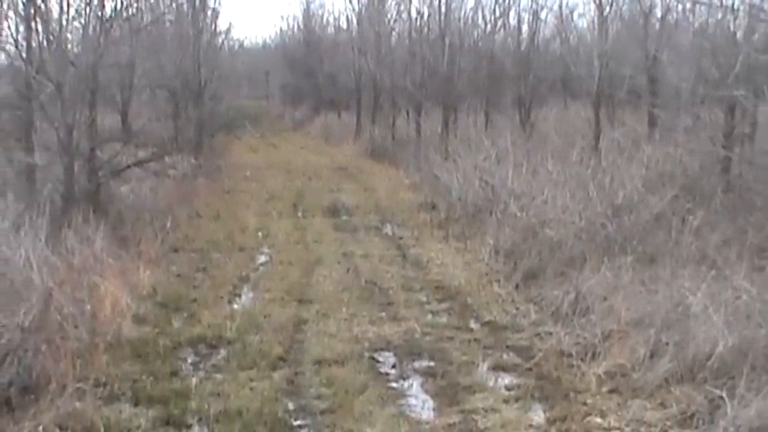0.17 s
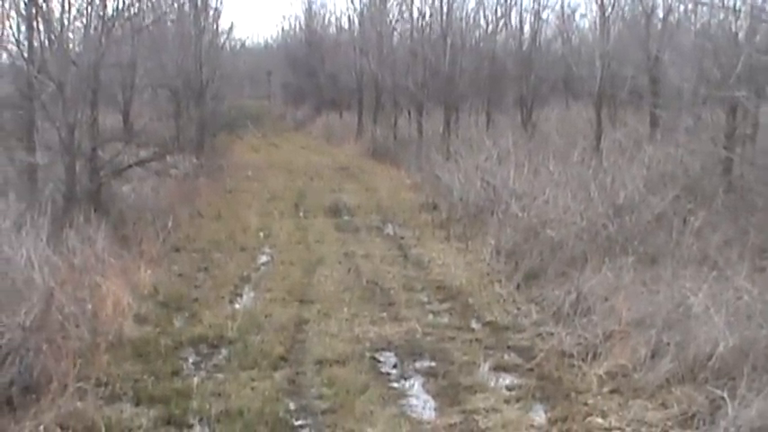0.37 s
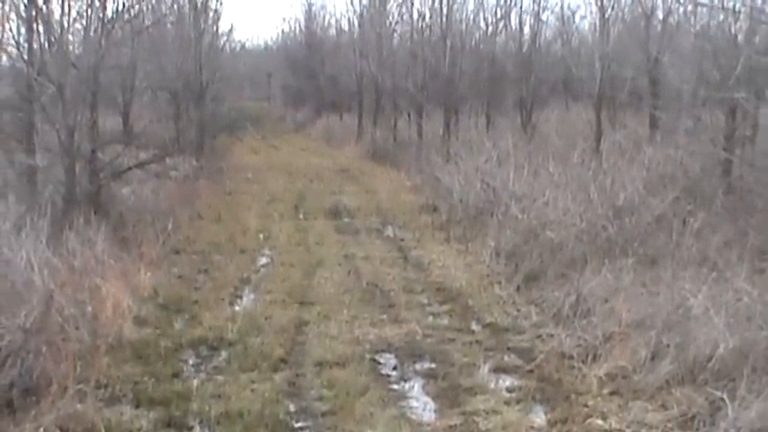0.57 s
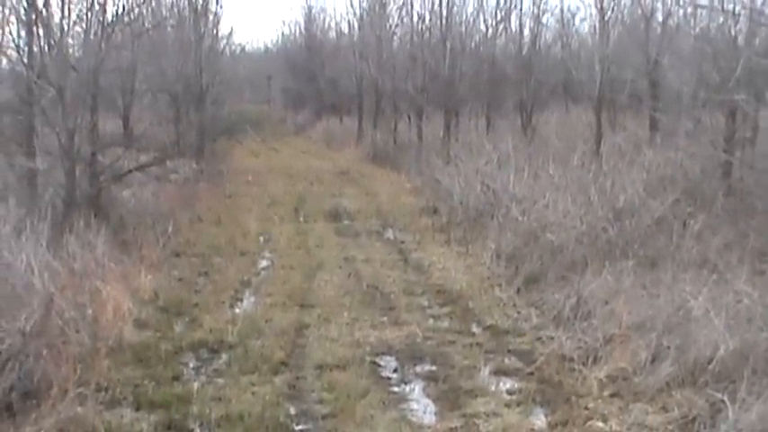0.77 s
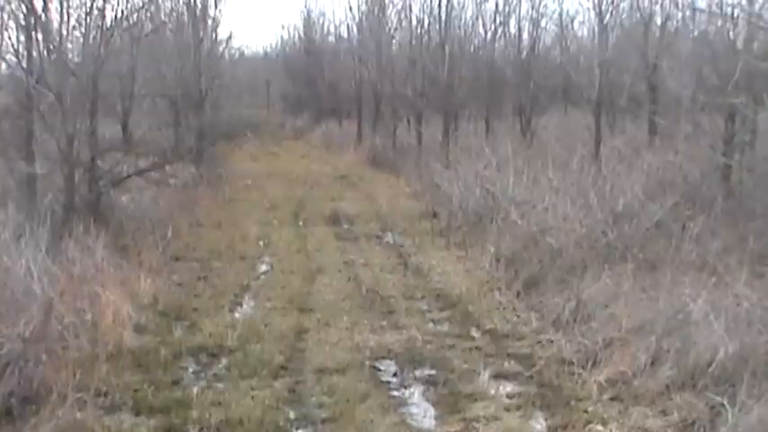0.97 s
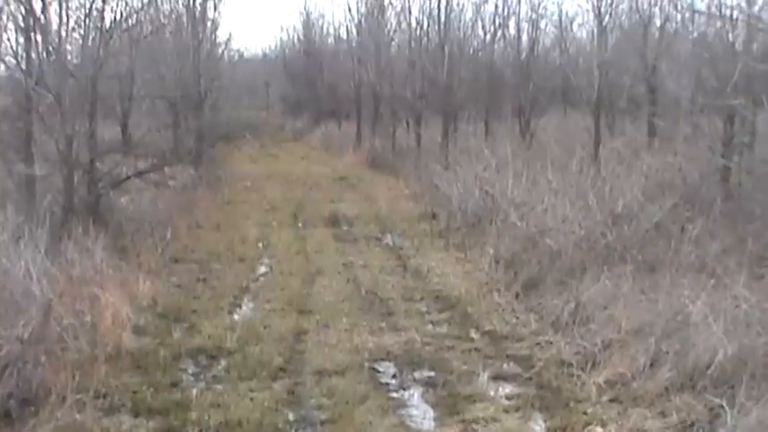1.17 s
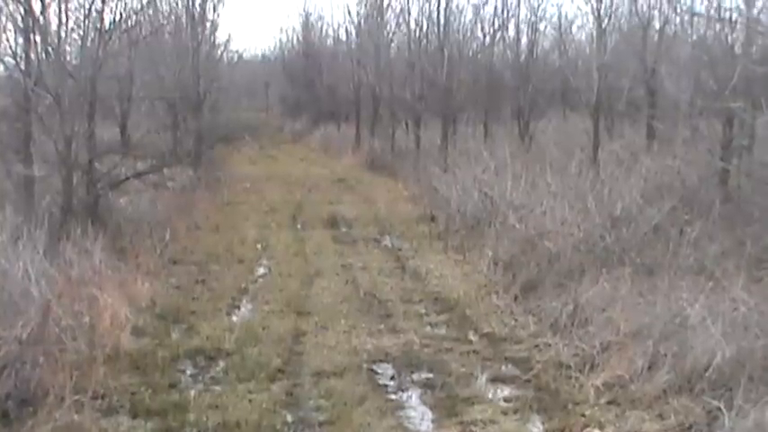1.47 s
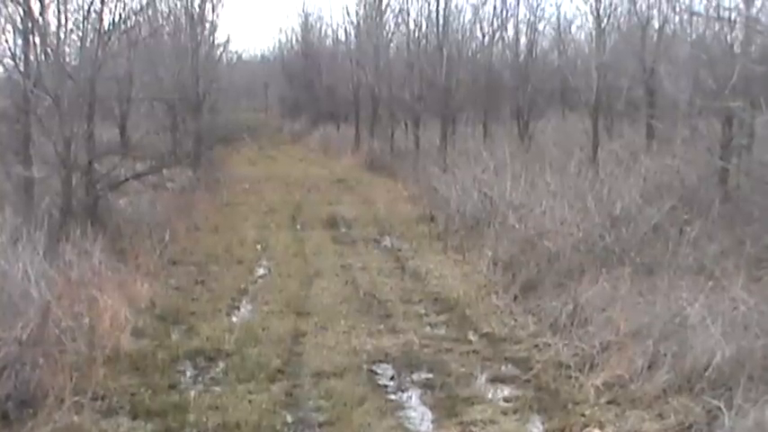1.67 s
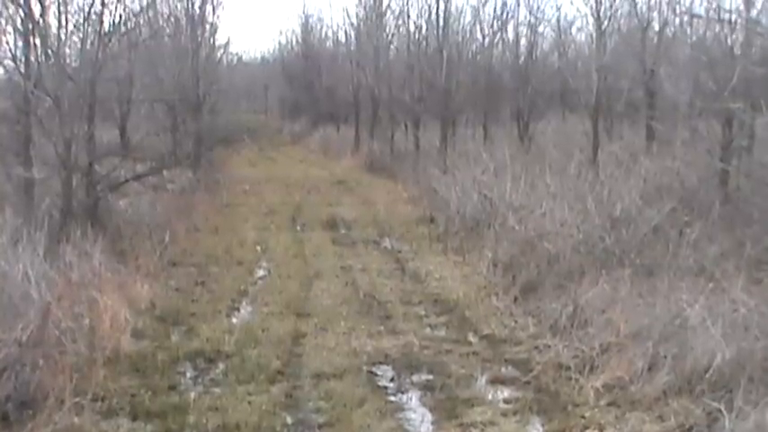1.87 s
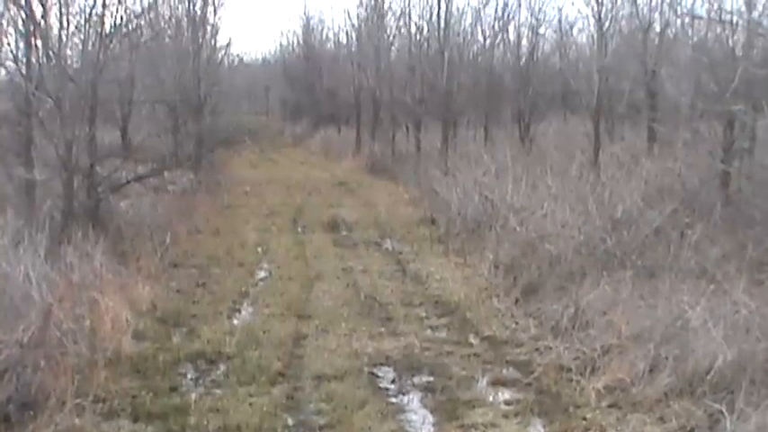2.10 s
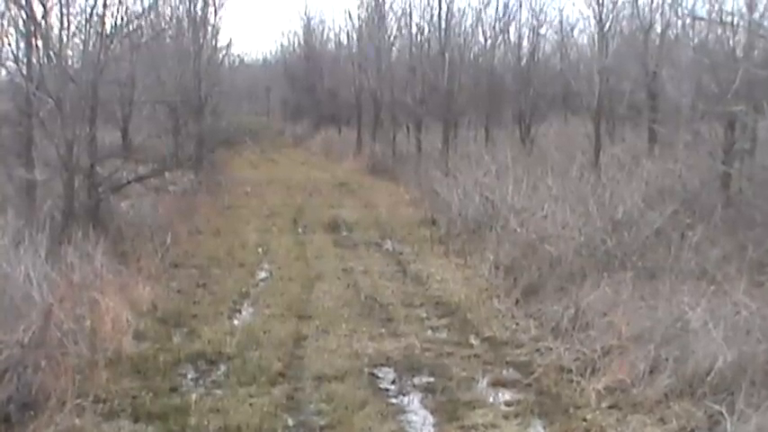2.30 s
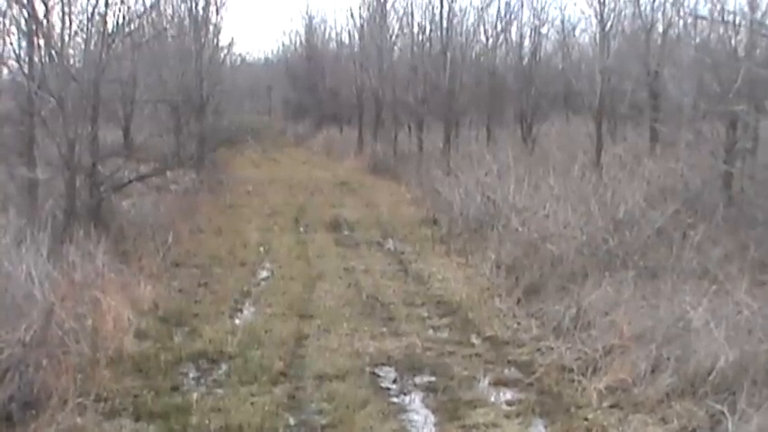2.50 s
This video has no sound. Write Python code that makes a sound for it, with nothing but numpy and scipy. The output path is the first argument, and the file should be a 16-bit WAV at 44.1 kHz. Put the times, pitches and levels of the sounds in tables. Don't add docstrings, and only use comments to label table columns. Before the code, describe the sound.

A hound bays in calm bare woods, out of sight and slightly left. An earlier bay's echo fades, then five short bays come at about 0.25, 0.75, 1.25, 1.8 and 2.25 seconds: high yelp, rasp, lower steady voice, quick closing blip, long thin echo. A twig snaps clearly at 0.45, faintly at 2.2. Soft hiss continues; low wind thumps touch the microphone from 1.3, strongest near 2.05.

```python
import sys
import numpy as np
from scipy import signal
from scipy.fft import rfft, irfft, next_fast_len
from scipy.io import wavfile
from scipy.ndimage import uniform_filter1d, map_coordinates

SR = 44100
rng = np.random.default_rng(int(sys.argv[2]) if len(sys.argv) > 2 else 0)


def output_pcm(signal):
    pcm = np.clip(np.atleast_2d(signal).T, -1, 1) * 32767
    wavfile.write(sys.argv[1], SR, np.round(pcm).astype(np.int16))


def ratio(d):
    e = np.asarray(d, float) / 20
    return 10 ** e


N = 116865
LEAD_S = 0.25

# [f/Hz, level/dB]
AIR_TONE = [(12, -48), (20, 6), (315, -1), (746, -5), (1070, -10), (1500, -16.5), (1670, -13.5),
            (2330, -16), (15500, -21.5)]
# [f/Hz, likeness 0-1]
AIR_ALIKE = [(60, 1), (200, 0.49), (500, 0.51), (1500, 0.35), (5000, 0.067), (14000, 0.87)]
# [f/Hz, level/dB]
WHINE = [(15734, -68)]
AIR_DB = -48.5

# [f/Hz, time to fall 60 dB/s]
TRUNK_RING = [(450, 0.6), (800, 0.33), (1150, 0.9), (1750, .9), (3000, 0.85), (6000, 0.24)]
# [delay/s, level/dB]
NEAR_TRUNKS = [(.011, -17), (.023, -50), (.041, -17.5)]
TRUNKS_DB, TRUNKS_ALIKE = -16, 0.86
DOG_LEFT_DB = 2.5

# [t/s, pitch/Hz, level/dB]
YELP = [
    [(0.236, 792, -26), (0.252, 801, -17), (0.322, 698.4, -36.5), (0.34, 633, -56)],
    [(1.254, 716, -29.5), (1.272, 802.5, -20.5), (1.308, 707.3, -21), (1.4, 722, -38.5)],
    [(1.775, 932, -45), (1.789, 941, -40), (1.803, 755, -38), (1.85, 648.4, -38)],
    [(2.238, 842, -28.5), (2.252, 851.4, -21), (2.314, 702, -35), (2.335, 708, -21)],
]
# [t/s, pitch/Hz, level/dB]
GLIDE = [
    [(.731, 782, -40), (.739, 858, -34), (.759, 1038, -36), (.769, 1240, -33), (.775, 1305, -30),
     (.781, 1270, -34)],
    [(.787, 665, -33), (.802, 650, -27), (.815, 640, -36)],
]
YELP_OVERTONES_DB = [2, -19.5, -20, -17, -29.5, -64]
YELP_DB, YELP_TOP_HZ = 0, 4100
EDGE_S, RELEASE_S = 0.0042, 0.015
SHAKE_FULL_DB, SHAKE_DEPTH, SHAKE_RATE = -33, 0.38, 190

# [t/s, level/dB, mouth resonance/Hz]
RASP = [
    [(-.24, -26.5, 2900), (-.14, -28.5, 2840)],
    [(.245, -34, 3100), (.265, -29.5, 2230), (.283, -22, 2080), (.3, -25, 1620), (.329, -36, 2220),
     (.367, -39, 2360), (.385, -29, 1580)],
    [(.733, -41, 2370), (.745, -25, 3011), (.76, -27.5, 2880), (.775, -28.5, 2542), (.8, -25, 3200),
     (.82, -47, 2315), (.85, -35, 2400), (.866, -27, 1720), (.875, -36, 1500)],
    [(1.27, -24.5, 1610), (1.285, -33, 1760), (1.31, -29.5, 1907), (1.335, -28, 1750), (1.35, -35, 1300),
     (1.39, -33, 2580), (1.405, -40, 1400)],
    [(1.777, -38.5, 2960), (1.797, -27.5, 2312), (1.815, -29, 2665), (1.835, -35.5, 2865),
     (1.87, -36, 2500), (1.917, -37, 2600), (1.93, -43, 1590)],
    [(2.257, -33, 1690), (2.272, -31, 2407), (2.288, -29.5, 2094), (2.303, -37, 1680), (2.318, -34.5, 1230),
     (2.35, -50, 2222), (2.375, -29.5, 1700)],
]
# [f/Hz, width/Hz, level/dB]
CAVITIES = [(668, 92, 14), (1400, 480, 2), (1890, 330, -1), (2365, 340, -2), (2684, 100, 2.5),
            (3033, 84, 9), (4030, 230, 7), (8450, 3000, -34)]
MOUTH_HZ = [1200, 1500, 1900, 2350, 2800, 3200]
MOUTH_SHARP, MOUTH_DB = 7, 17
RASP_DB, RASP_SIZE_DB = 2, 2.5
RASP_RATE, RASP_SCATTER = 360, 0.06
RASP_OF_YELP, RASP_DRIFT = 0.4, 0.045

# [t/s, pitch/Hz, level/dB, mouth opening 0-1, upper ring/dB]
BAY = [
    [(.296, 560, -32, .85, -5), (.306, 559.3, -23, 0.7, -14.5), (.321, 562.7, -22.5, 0.8, -15),
     (.339, 541, -33.5, 0.25, 0), (.352, 537.4, -33, 0.7, 3.5), (.365, 538, -25.5, 0.84, 2),
     (.38, 569, -29, 1, -12)],
    [(.779, 618, -25, 0.43, -23), (.788, 610.3, -22.5, 0.72, -4), (.804, 595, -21.5, 0.75, 6),
     (.814, 577.6, -23, 0.5, -11), (.826, 576, -23.5, 0, -36), (.848, 573.6, -27, 0.26, -10),
     (.861, 585, -28, .7, -1), (.87, 550, -20, 0.5, 3)],
    [(1.343, 561, -26, 0.3, -2), (1.35, 560.7, -29, 0.68, 5), (1.36, 555.6, -28, 0.98, -15),
     (1.374, 559, -30, 1, -7), (1.394, 558.5, -34, 0.84, 8), (1.403, 556.4, -39, 0.8, -4)],
    [(1.803, 622.8, -38, 0.43, -3), (1.821, 597.6, -30.5, .1, -2), (1.837, 575.5, -32, 0.41, 11.5),
     (1.857, 567.7, -25.5, 0.01, -16), (1.889, 574.5, -30.5, 0.04, -1.5), (1.91, 580.3, -28.5, 0.15, 3),
     (1.925, 585.6, -30, 0.03, -5), (1.933, 563.4, -32, 0.5, -16)],
    [(2.308, 633, -20, 0.35, 2), (2.318, 612, -37, 0.05, -1), (2.329, 593.5, -29.5, 0.21, -4),
     (2.338, 580, -28.5, 0.24, 8), (2.35, 591.8, -34.5, 0.56, 12.5), (2.365, 567, -33, 0.49, 10),
     (2.371, 557, -43, 0.6, -5)],
]
EARLIER_BAY = [
    (-.23, 539.4, -21, .3, 1.8),
    (-.12, 524.4, -31.5, 0.25, 1.8),
]
# [f/Hz, level/dB]
THROAT = [(1150, 2), (1750, 1), (2300, -18.5), (3000, -6.5), (3500, -22.5), (4500, -28), (5300, -42.5),
          (8500, -37)]
BAY_DB, CHEST_DB = 0.5, -8
CHEST_FOLLOWS = 0.21

# [t/s, level/dB, length/s]
CLOSES = [
    (0.368, -29, 0.023),
    (0.859, -26.5, 0.026),
    (1.398, -22.5, 0.023),
    (1.907, -43, 0.0313),
    (2.361, -30, 0.024),
]
CLOSE_FROM_HZ, CLOSE_TO_HZ, CLOSE_FALL, CLOSE_SWELL_DB = 1150, 700, 3, 14

# [f/Hz, level/dB]
AIRFLOW_TONE = [(3500, -1), (6000, -6), (7200, -5), (9000, 1), (11000, -6), (13000, -27)]
AIRFLOW_DB, AIRFLOW_LAG_S, AIRFLOW_GROWS = -44.5, 0.075, 0.49
OPEN_MOUTH_HZ = 1000

# [t/s, treble/dB, breath hiss/dB]
FACING = [
    (-.1, 4, 12),
    (0.299, -1, 2.5),
    (.8, -0.5, 1),
    (1.35, -9.5, 0.5),
    (1.85, -3, 2),
    (2.351, -8, 5.5),
]
FACING_HZ, BEAM_TOP_HZ = 2170, 3960
SIDEWAYS_EVEN = 0.99

# [t/s, peak/dB]
SNAPS = [
    (.455, -19.5),
    (2.217, -38.5),
]
# [f/Hz, level/dB, time to fall 60 dB/s]
TWIG_TONES = [(3500, -8, 0.005), (7240, -10, 0.003), (9670, -8, 0.005), (12100, -4, 0.004)]
TWIG_TOP_HZ = 13500

# [t/s, level/dB, width/s]
LUMPS = [(1.33, -39, 0.0085), (1.815, -27.5, 0.0054), (1.83, -29.5, 0.0059), (1.845, -30, 0.0033),
         (1.9, -30, 0.0051), (1.92, -35.5, 0.0047), (2.012, -48, 0.0077), (2.022, -23.5, 0.0046),
         (2.048, -23, 0.0026), (2.062, -26, 0.0033), (2.073, -34, 0.0032), (2.17, -34, 0.0086),
         (2.22, -35, 0.0059), (2.33, -39, 0.0076), (2.37, -36, 0.0068), (2.6, -49, 0.0072)]
LUMP_NARROW = 0.71
FLUTTER_DB, FLUTTER_HZ, FLUTTER_SPREAD = -11.5, 194.5, 5.7

LOW_CUT_HZ, TOP_HZ = 40, 15880


def unit(x):
    return x / np.sqrt(np.mean(x ** 2) + 1e-20)


def along(points, hz):
    f, value = np.transpose(points)
    return np.interp(np.log(hz + 1), np.log(f + 1), value)


def clock():
    return np.arange(-round(LEAD_S * SR), N) / SR


def phrases(tables):
    t = clock()
    gate = 0
    for rows in tables:
        opening = (t - rows[0][0]) / EDGE_S
        closing = (rows[-1][0] - t) / RELEASE_S
        gate = gate + np.clip(np.minimum(opening, closing) + 0.5, 0, 1)
    times, *columns = np.transpose(np.concatenate(tables))
    return [gate ** 2] + [np.interp(t, times, column) for column in columns]


def wobble(rate):
    n = len(clock())
    knots = rng.standard_normal(int(n * rate / SR) + 4)
    return map_coordinates(knots, [np.arange(n) * rate / SR])


def filtered(x, response):
    n = x.shape[-1]
    m = next_fast_len(n + 8192)
    return irfft(rfft(x, m) * response(np.fft.rfftfreq(m, 1 / SR)), m)[..., :n]


def air():
    def middle_and_side(f):
        turn = np.arccos(np.clip(along(AIR_ALIKE, f), -1, 1)) / 2
        return ratio(along(AIR_TONE, f)) * [np.cos(turn), np.sin(turn)]

    mid, side = filtered(rng.standard_normal((2, N)), middle_and_side)
    level = ratio(AIR_DB + 0.057 * wobble(2.1)[:N])
    hush = np.array([mid + side, mid - side]) / np.std(mid) * level
    t = np.arange(N) / SR
    return hush + sum(np.sqrt(2) * ratio(db) * np.sin(2 * np.pi * hz * t) for hz, db in WHINE)


def woods(ahead, sideways):
    hz, t, z = signal.stft(rng.standard_normal((3, SR)), SR, nperseg=256)
    fade = ratio(-60 * t / along(TRUNK_RING, hz)[:, None])
    tail = signal.istft(z * fade, SR, nperseg=256)[1]
    own = np.sqrt(1 - min(TRUNKS_ALIKE, 0.99) ** 2)
    tail = TRUNKS_ALIKE * tail[2] + own * tail[:2]
    tail = tail / np.linalg.norm(tail[0])
    delayed = np.pad(sideways, (600, 0))[None]
    wet = signal.fftconvolve(delayed, tail, axes=1)[:, :len(ahead)]
    near = ahead + sum(ratio(db) * np.roll(ahead, round(s * SR)) for s, db in NEAR_TRUNKS)
    balance = ratio([[DOG_LEFT_DB / 2], [-DOG_LEFT_DB / 2]])
    return (near * balance + ratio(TRUNKS_DB) * wet)[:, -N:]


def yelp():
    gate, hz, db = phrases(sorted(YELP + GLIDE))
    rasp_gate, rasp_db, _ = phrases(RASP)
    shake = SHAKE_DEPTH * np.clip(rasp_gate * ratio(rasp_db - SHAKE_FULL_DB), 0, 1)
    phase = 2 * np.pi * np.cumsum(hz) / SR + shake * wobble(SHAKE_RATE)
    tone = 0
    for k, overtone_db in enumerate(YELP_OVERTONES_DB, 1):
        fade = 1 + (k * hz / YELP_TOP_HZ) ** 10
        tone = tone + ratio(overtone_db) * np.sin(k * phase) / fade
    level = ratio(db + YELP_DB) * (1 + shake * wobble(SHAKE_RATE))
    return np.sqrt(2) * gate * level * tone


def rasp():
    gate, db, mouth_hz = phrases(RASP)
    yelp_hz = phrases(sorted(YELP + GLIDE))[1]
    pulse_hz = RASP_OF_YELP * yelp_hz * (1 + RASP_DRIFT * wobble(45))
    beats = np.flatnonzero(np.diff(np.floor(np.cumsum(pulse_hz) / SR)))
    count = len(beats)
    scatter = RASP_SCATTER * rng.standard_normal(count) * SR / RASP_RATE
    at = np.clip(beats + scatter, 0, len(gate) - 1).astype(int)
    sizes = ratio(RASP_SIZE_DB * rng.standard_normal(count))
    pulses = np.bincount(at, sizes, len(gate))
    pulses = unit(pulses - pulses.mean()) + 0.2 * rng.standard_normal(len(gate))

    def ring(f, centre, width):
        return 1j * f * width / (centre * centre - f * f + 1j * f * width)

    def throat_response(f):
        rings = sum((-1) ** k * ratio(g) * ring(f, c, w) for k, (c, w, g) in enumerate(CAVITIES))
        low_cut = f ** 4 / (f ** 4 + 520 ** 4)
        drop_above = 1 + ratio(27.5) / (1 + (3900 / (f + 1)) ** 12)
        return rings * low_cut / drop_above

    throat = unit(filtered(pulses, throat_response))
    place = np.interp(mouth_hz, MOUTH_HZ, np.arange(len(MOUTH_HZ)))
    mouth = 0
    for k, c in enumerate(MOUTH_HZ):
        share = np.clip(1 - np.abs(place - k), 0, 1)
        mouth = mouth + share * filtered(throat, lambda f: ring(f, c, c / MOUTH_SHARP))
    return gate * ratio(db + RASP_DB) * unit(throat + ratio(MOUTH_DB) * mouth)


def bay(even):
    gate, hz, db, mouth, ring_db = phrases([EARLIER_BAY] + BAY)
    phase = 2 * np.pi * np.cumsum(hz * (1 + 0.005 * wobble(120))) / SR
    gains = []
    for k in range(1, 16):
        overtone_db = along(THROAT, k * hz) + 1.5 * wobble(60)
        if k > 3:
            overtone_db = overtone_db + ring_db / (2 if k > 5 else 1)
        flicker = wobble(50) if k > 6 else 1
        gains.append(ratio(overtone_db) * flicker)
    turn = np.pi / 2 * np.clip(mouth + even * (0.5 - mouth), 0.04, 0.96)
    gains[0] = gains[0] * ratio(CHEST_DB + CHEST_FOLLOWS * ring_db)
    gains[1] = gains[1] * np.cos(turn)
    gains[2] = gains[2] * np.sin(turn)
    tone = sum(g * np.sin((k + 1) * phase + k * k) for k, g in enumerate(gains))
    return np.sqrt(2) * gate * ratio(db + BAY_DB) * tone


def closes():
    out = 0
    for s, db, length in CLOSES:
        u = np.clip((clock() - s) / length, 0, 1)
        hz = CLOSE_TO_HZ + (CLOSE_FROM_HZ - CLOSE_TO_HZ) * np.exp(-CLOSE_FALL * u)
        shape = np.sqrt(2 * np.abs(np.sin(np.pi * u ** 1.5)))
        level = ratio(db + CLOSE_SWELL_DB * (u - 0.7))
        out = out + level * shape * np.sin(2 * np.pi * np.cumsum(hz) / SR)
    return out


def airflow(voice):
    lag = round(AIRFLOW_LAG_S * SR)
    voice = filtered(voice, lambda f: f > OPEN_MOUTH_HZ)
    power = np.abs(uniform_filter1d(voice ** 2, size=lag, origin=lag // 3))
    effort = power ** (AIRFLOW_GROWS / 2)
    hiss = unit(filtered(rng.standard_normal(len(voice)), lambda f: ratio(along(AIRFLOW_TONE, f))))
    puffs = 1 + 0.7 * np.tanh(30 * np.maximum(voice, 0))
    return ratio(AIRFLOW_DB + 2.4 * wobble(40.25)) * effort * hiss * puffs


def dog():
    rest = yelp() + rasp() + closes()
    voice = rest + bay(0)
    s, treble_db, hiss_db = np.transpose(FACING)
    hiss = ratio(np.interp(clock(), s, hiss_db)) * airflow(voice)
    rest, voice = rest + hiss, voice + hiss

    def beam_response(f):
        return f ** 8 / (f ** 8 + FACING_HZ ** 8) / (1 + (f / BEAM_TOP_HZ) ** 12)

    beam = filtered(voice, beam_response)
    ahead = voice + (ratio(np.interp(clock(), s, treble_db)) - 1) * beam
    return ahead, rest + bay(SIDEWAYS_EVEN)


def twig():
    out, t = np.zeros(N), np.arange(SR // 10) / SR
    for s, db in SNAPS:
        ring = sum(ratio(g - 60 * t / t60) * np.sin(2 * np.pi * hz * t) for hz, g, t60 in TWIG_TONES)
        fade = 0.59 * ratio(-60 * t / 0.0051) + 0.072 * ratio(-60 * t / 0.15)
        rustle = np.diff(rng.standard_normal(len(t) + 1)) * fade
        out[round(s * SR):][:len(t)] += ratio(db - 3) * (ring + rustle)
    return filtered(out, lambda f: 1 / (1 + (f / TWIG_TOP_HZ) ** 16))


def wind():
    sides = ratio(2 * rng.standard_normal((len(LUMPS), 2, 1)))
    noise = filtered(rng.standard_normal((2, N)), lambda f: 1 / (1 + (f / FLUTTER_HZ) ** 3))
    flutter = ratio(FLUTTER_DB) * unit(noise)
    out = 0
    for k, (s, db, width) in enumerate(LUMPS):
        u = ((np.arange(N) / SR - s) / (width * LUMP_NARROW)) ** 2
        swing = -(-1) ** k * sides[k] * (1 - u) * np.exp(-u / 2)
        out = out + ratio(db) * (swing + flutter * np.exp(-u / FLUTTER_SPREAD ** 2))
    return out


def scene():
    return woods(*dog()) + twig() + wind() + air()


def top_cut(x):
    return signal.sosfilt(signal.butter(12, 16510, fs=SR, output="sos"), x)


def record(dry):
    def microphone(f):
        return (f < TOP_HZ) * f ** 2 / (f ** 2 + LOW_CUT_HZ ** 2)

    mix = filtered(dry, microphone)
    return top_cut(mix)


dry = scene()
out = record(dry)
output_pcm(out)
```